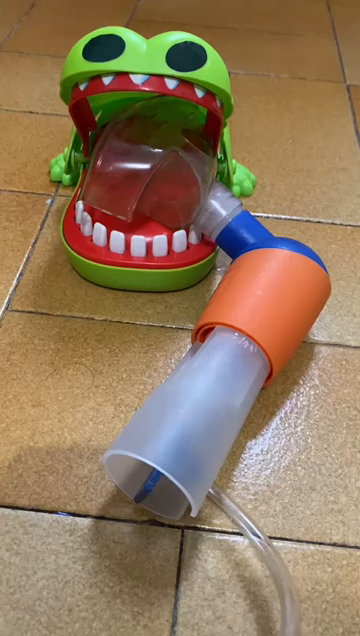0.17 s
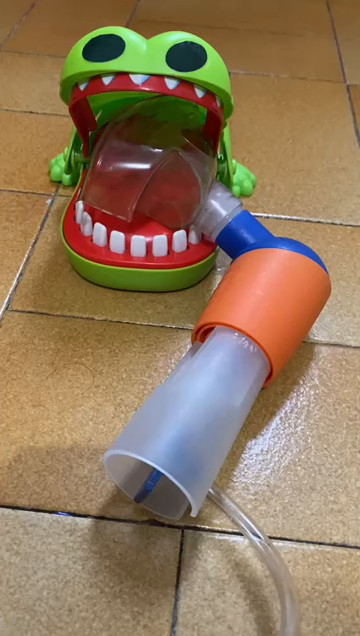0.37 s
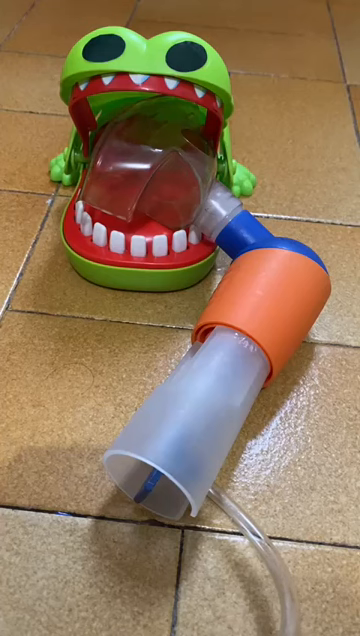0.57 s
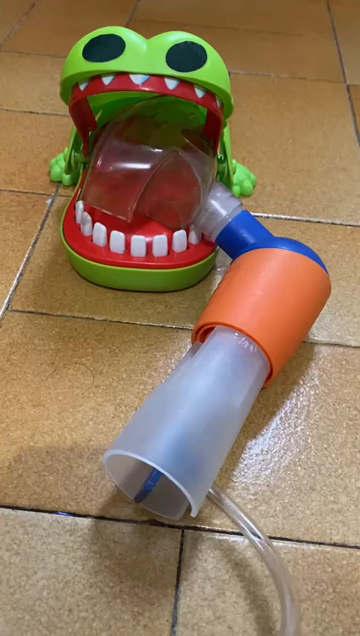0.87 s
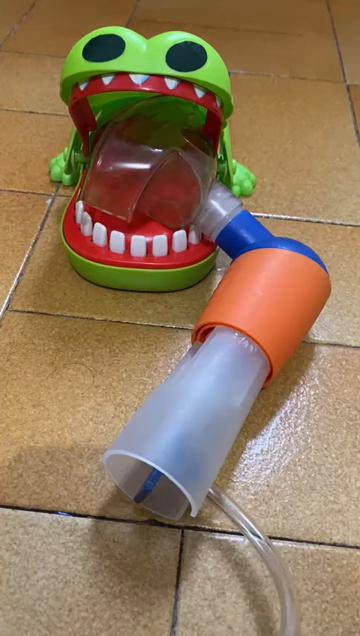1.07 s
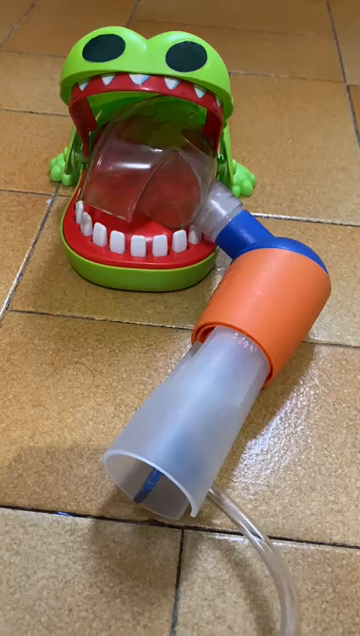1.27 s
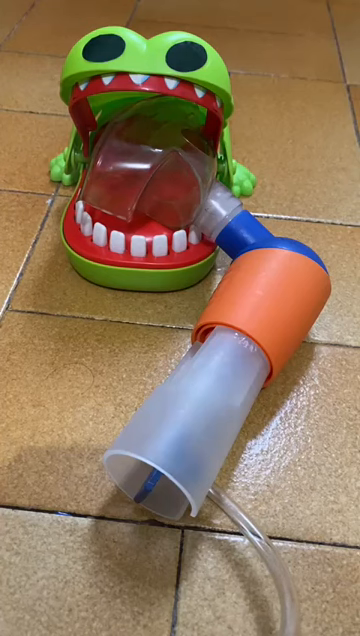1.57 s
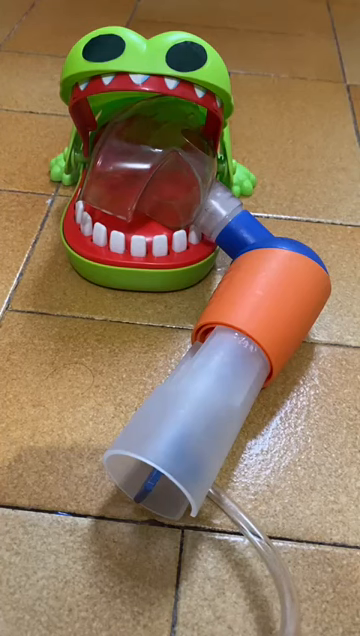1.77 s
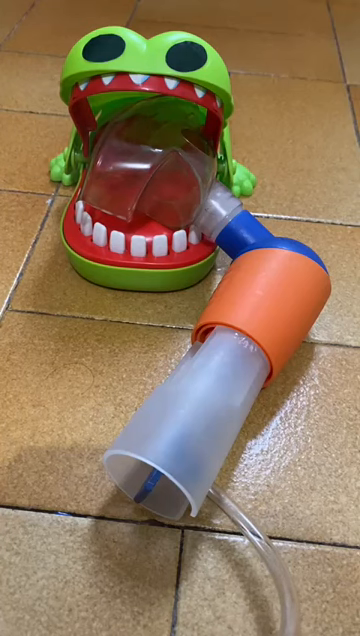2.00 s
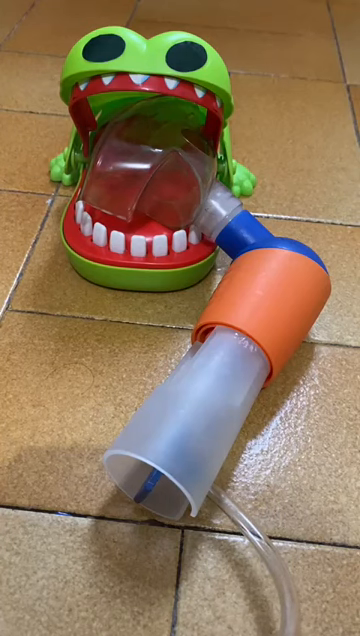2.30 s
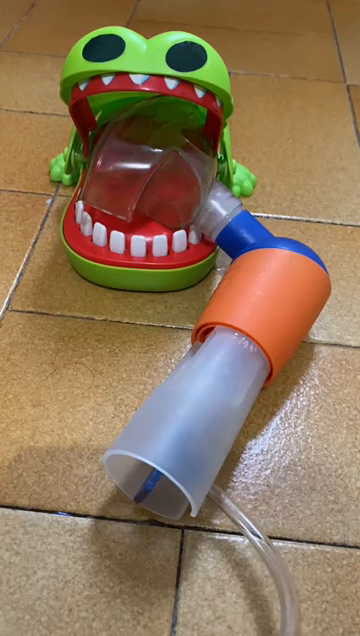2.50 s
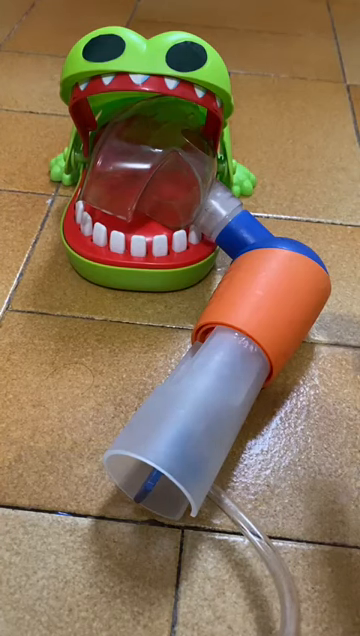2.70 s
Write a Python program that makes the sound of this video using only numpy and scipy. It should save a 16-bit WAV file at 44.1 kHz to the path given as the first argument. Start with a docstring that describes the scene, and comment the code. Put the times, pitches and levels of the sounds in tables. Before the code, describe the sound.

After a tiny silence, a compressor motor cuts in already running and holds a low, rattling hum to the end, with thin, fluttering air hiss on top, heard close indoors on a phone microphone.

```python
"""Small piston air compressor

A compressor drones: two valve knocks per shaft turn sound as steady shaft orders and a pulsing casing rattle.
Air sputters and hisses from the nozzle through the resonances of a plastic tube, in filtered noise.
Mains hum of the motor coil puts fainter lines between the orders. The sound cuts in after a short silence."""
import sys
import numpy as np
from scipy import signal
from scipy.fft import rfft, irfft, next_fast_len
from scipy.io import wavfile
from scipy.ndimage import uniform_filter1d, map_coordinates

SR = 44100
rng = np.random.default_rng(int(sys.argv[2]) if len(sys.argv) > 2 else 0)


def to_wav(s):
    """Save 16-bit WAV."""
    ch = np.atleast_2d(s).T  # columns
    pcm = np.round(np.clip(ch, -1, 1) * 32767)  # PCM
    wavfile.write(sys.argv[1], SR, pcm.astype(np.int16))


N = 125685

# Shaft speed. Each row: time in seconds, speed in turns per second.
SHAFT_SPEED = [(0, 44.89), (.9, 44.75), (1.6, 44.665), (2.3, 44.61), (2.85, 44.6)]
# Valve knocks of one turn. Each row: place in the turn (0-1), relative strength in dB.
VALVE_KNOCKS = [(.3136, 0), (.9043, -3)]
# Phase lead of the side over the centre. Each row: frequency in Hz, lead in radians.
SIDE_LEAD_RAD = [(300, .9), (650, 1.25), (1000, 1.05), (1400, 2.1), (2400, 1.8), (4800, 1.9), (6000, 1.5),
                 (12000, 1.55)]


def amp(db):
    """Gain of a level in dB."""
    return 10 ** (np.asarray(db) / 20)


def unit(x):
    """x scaled to rms 1."""
    return x / np.sqrt(np.mean(x ** 2) + 1e-20)


def along(points, hz):
    """Interpolate (Hz, value) points on a log frequency axis."""
    point_hz, values = np.transpose(points)
    return np.interp(np.log(hz + 1), np.log(point_hz + 1), values)


def curve(rows):
    """One value per sample from (s, value) rows."""
    return np.interp(np.arange(N) / SR, *np.transpose(rows))


def wobble(knots_per_s):
    """Smooth random curve: a spline through normal random knots."""
    knots = rng.standard_normal(N // 100)
    return map_coordinates(knots, [np.arange(N) * knots_per_s / SR])


def filtered(x, response):
    """Multiply the spectrum of x by a response of frequency, zero-padded against wrap-around."""
    padded = next_fast_len(N + SR // 2)
    spectrum = rfft(x, padded) * response(np.fft.rfftfreq(padded, 1 / SR))
    return irfft(spectrum, padded)[..., :N]


def patchy(patchy_db):
    """White noise, rms 1, with time-frequency patches of random gain (patchy_db rms)."""
    z = signal.stft(rng.standard_normal(N), nperseg=512)[2]
    field = uniform_filter1d(rng.standard_normal(z.shape), size=6, axis=0)  # across frequency
    field = uniform_filter1d(field, size=10, axis=1)  # across time
    noise = signal.istft(z * amp(patchy_db * unit(field)), nperseg=512)[1]
    return unit(noise[:N])


def tone(phase, hz, mid_db, side_db):
    """Line of slightly wavering level as centre and side, the side leading in phase."""
    waver_db = .5
    gain = np.sqrt(2) * amp(waver_db * wobble(9))  # sqrt(2): levels are rms
    mid = amp(mid_db) * np.cos(phase)
    side = amp(side_db) * np.cos(phase + along(SIDE_LEAD_RAD, hz))
    return gain * np.array([mid, side])


def heard(env, mid_db, side_db, patchy_db):
    """Noise under env at two microphone ports: coloured centre and side, partly shared, side leading."""
    # Centre-side likeness. Each row: frequency in Hz, likeness (0-1).
    likeness = [(300, .3), (800, .65), (1300, .4), (1600, .1), (2300, .1), (2900, .75), (3600, .1),
                (4800, .75), (5600, .35), (6300, .75), (7200, .88), (7800, .3), (8500, .6), (9200, .2)]
    common, separate = [env * np.sqrt(SR / 2) * patchy(patchy_db) for _ in "ab"]  # 0 dB per Hz
    side = filtered(common, lambda hz: along(likeness, hz) * np.exp(1j * along(SIDE_LEAD_RAD, hz)))
    side = side + filtered(separate, lambda hz: np.sqrt(1 - along(likeness, hz) ** 2))
    mid = filtered(common, lambda hz: amp(along(mid_db, hz)))
    return np.array([mid, filtered(side, lambda hz: amp(along(side_db, hz)))])


def orders(turns):
    """Shaft orders: phases of the two knocks in each turn, turned by the casing resonance."""
    # Each row: multiple of shaft speed, centre level in dB, side level in dB.
    shaft_lines = [(1, -45, -120), (2, -43, -120), (3, -58, -116), (4, -51, -120), (5, -43, -118),
                   (6, -55, -99), (7, -62, -65), (8, -63, -82), (9, -55, -65), (10, -44, -72),
                   (11, -74, -78), (12, -45.5, -57), (13, -47, -61), (14, -45.5, -50), (15, -51, -49),
                   (16, -63, -66), (17, -53, -53), (18, -59, -60), (19, -65, -64), (20, -68, -61),
                   (21, -64, -64), (22, -57, -55), (23, -62, -69), (24, -64, -58), (25, -63, -59),
                   (27, -70, -57), (28, -64, -77), (29, -66, -60), (30, -60, -56), (31, -71, -71),
                   (32, -61, -57), (33, -67, -66), (34, -62, -77), (35, -62, -70), (36, -66, -73),
                   (39, -67, -71), (41, -65, -76), (42, -66, -87), (44, -66, -120), (46, -69, -120),
                   (47, -69, -116), (61, -69, -80), (62, -67, -74), (63, -65, -73), (64, -61, -69),
                   (66, -65, -72), (69, -70, -72), (70, -68, -79)]
    ring_lag_turns = .1273  # from a knock to its low ring
    ring_spread_turns = .0012  # each higher multiple comes earlier
    jitter_rad = .004  # per multiple
    casing_hz, casing_width_hz = 158, 59
    out, drift = np.zeros((2, N)), wobble(12)
    for k, mid_db, side_db in shaft_lines:
        pair = sum(amp(db) * np.exp(-2j * np.pi * k * at) for at, db in VALVE_KNOCKS)
        phase = 2 * np.pi * k * (turns - ring_lag_turns + ring_spread_turns * k / 2)
        phase = phase + np.angle(pair) + jitter_rad * k * drift
        hz = k * SHAFT_SPEED[0][1]
        casing_rad = np.angle(1j / (casing_hz ** 2 - hz ** 2 + 1j * hz * casing_width_hz))
        out += tone(phase + casing_rad, hz, mid_db, side_db)
    return out


def knocking(turns):
    """Envelope, rms 1, that jumps at each knock and decays, every knock a new size."""
    decay_turns, depth, scatter_db = .1, 1.1, 1.5  # depth: rise over a floor of 1
    env = np.ones(N)
    for at, db in VALVE_KNOCKS:
        since = turns - at + 1
        sizes = amp(db + scatter_db * rng.standard_normal(200))
        size = sizes[since.astype(int)]
        env = env + depth * size * np.exp(-(since % 1) / decay_turns)
    return unit(uniform_filter1d(env, size=30))


def rattle(turns):
    """Casing rattle: coloured noise pulsing with the knocks."""
    # Centre, then side spectrum. Each row: frequency in Hz, level in dB per Hz.
    rattle_mid = [(10, -94), (25, -74), (35, -71), (60, -72), (150, -70), (200, -72.5), (330, -78),
                  (400, -76.5), (480, -77.5), (540, -71.5), (620, -68.5), (700, -75.5), (830, -79),
                  (1000, -78), (1130, -80), (1320, -74.5), (1800, -74.5), (2300, -86), (2600, -82.5),
                  (2900, -71.5), (3150, -80.5), (3700, -95), (4800, -81), (5300, -88.5), (5800, -89),
                  (6100, -120)]
    rattle_side = [(200, -112), (330, -87.5), (560, -74.5), (750, -77.5), (1400, -81), (1800, -80),
                   (1950, -112), (2500, -94), (2900, -76), (3150, -90), (3550, -106), (4000, -89),
                   (4300, -87), (4850, -82.5), (5000, -89), (5250, -97), (5600, -74.5), (5900, -120)]
    env = knocking(turns) * amp(.6 * wobble(8) + .6 * wobble(16))
    return heard(unit(env), rattle_mid, rattle_side, patchy_db=1.1)


def nozzle(turns):
    """Air hiss through the tube: noise that sputters at random, swells with each turn and spurts."""
    # Centre, then side spectrum. Each row: frequency in Hz, level in dB per Hz.
    hiss_mid = [(5300, -120), (5800, -101), (6400, -79.5), (6750, -94.5), (7220, -75), (7450, -86),
                (7850, -108), (8300, -83.5), (8900, -87), (9100, -105), (11500, -118), (12100, -102.5),
                (12500, -120)]
    hiss_side = [(5700, -90), (6000, -89), (6500, -79), (6780, -87), (7220, -69), (7450, -79), (7800, -86),
                 (8300, -68), (8750, -65), (9020, -72), (9250, -83), (9600, -75), (9950, -68), (10150, -80),
                 (10480, -97), (10720, -87), (10950, -99), (11600, -99), (12150, -91), (12350, -101),
                 (12560, -126)]
    # Slow course of the hiss. Each row: time in seconds, relative level in dB.
    hiss_course = [(.1, .6), (.3, 1.3), (.5, .4), (1.3, .6), (1.5, -.8), (2.15, -1.5), (2.85, -1.2)]
    # Spurts of air. Each row: start in seconds, rise before smoothing in dB.
    spurts = [(.287, 6), (.317, 5), (.558, 6), (.845, 7), (.982, 6), (1.21, 5), (1.326, 5), (1.392, 8),
              (1.638, 6), (1.924, 8), (2.326, 8), (2.379, 9), (2.613, 5), (2.707, 6), (2.757, 8),
              (2.824, 8)]
    # Random swells. Each row: rate in knots per second, depth in dB.
    sputter = [(30, .9), (75, 1.7)]
    spurt_decay_s, turn_swell_db = .008, .8
    t = np.arange(N) / SR
    spurt_db = sum(db * (t > s) * np.exp(-np.abs(t - s) / spurt_decay_s) for s, db in spurts)
    swell_db = sum(db * wobble(rate) for rate, db in sputter)
    swell_db = swell_db + turn_swell_db * np.cos(2 * np.pi * (turns - .9))
    level_db = uniform_filter1d(swell_db + spurt_db, size=60) + curve(hiss_course)
    return heard(unit(amp(level_db)), hiss_mid, [(5200, -125)] + hiss_side, patchy_db=1)


def mains(turns):
    """Motor-coil hum beating with the shaft: lines offset from the shaft orders by mains harmonics."""
    # Each row: multiple of shaft speed, offset in Hz, centre level in dB, side level in dB.
    hum_lines = [(0, 100, -57, -120), (1, 100, -58, -111), (8, 100, -64, -83), (9, 100, -57, -63),
                 (10, 100, -50, -60), (11, 100, -62, -68), (12, 100, -60, -62), (14, 100, -64, -63),
                 (15, 100, -62, -62), (17, 100, -65, -61), (19, 100, -66, -67), (12, -100, -63, -75),
                 (14, -100, -57, -67), (15, -100, -65, -65), (16, -100, -63, -71), (7, 200, -62, -67),
                 (8, 200, -62, -67), (16, -200, -64, -73)]
    peak_turn, lag_s, phase_cycles = .12, .00235, .205  # peak_turn: place in the turn where hum peaks
    t = np.arange(N) / SR - lag_s
    out = np.zeros((2, N))
    for k, offset_hz, mid_db, side_db in hum_lines:
        phase = 2 * np.pi * (k * (turns - peak_turn) + offset_hz * t + phase_cycles)
        out += tone(phase, k * SHAFT_SPEED[0][1] + offset_hz, mid_db, side_db)
    return out


def scene():
    """Sum the centre and side parts of all sources and turn them into left and right."""
    start_turn = .705
    turns = start_turn + np.cumsum(curve(SHAFT_SPEED)) / SR
    mid, side = orders(turns) + rattle(turns) + nozzle(turns) + mains(turns)
    return np.array([mid + side, mid - side])


def record(dry):
    """Phone pickup: cuts in late, level and bass settle, nothing kept above the band limit."""
    # Bass missing at the cut-in. Each row: frequency in Hz, share missing (0-1).
    bass_loss = [(20, .95), (45, 0.55), (90, 0.27), (220, 0.22), (400, .05), (800, 0.0091)]
    start_s, fade_s, bass_settle_s = .0928, .002, .72
    warmup_db, warmup_s, top_hz = -1, .35, 12570
    since = np.arange(N) / SR - start_s
    missing = filtered(dry, lambda hz: np.clip(along(bass_loss, hz), 0, 1))
    x = dry - missing * np.exp(-(since / bass_settle_s) ** 2)
    warmup = amp(warmup_db * np.exp(-np.abs(since) / warmup_s))
    x = x * np.clip(since / fade_s, 0, 1) * warmup
    return filtered(x, lambda hz: hz < top_hz)


dry = scene()
out = record(dry)
to_wav(out)
```